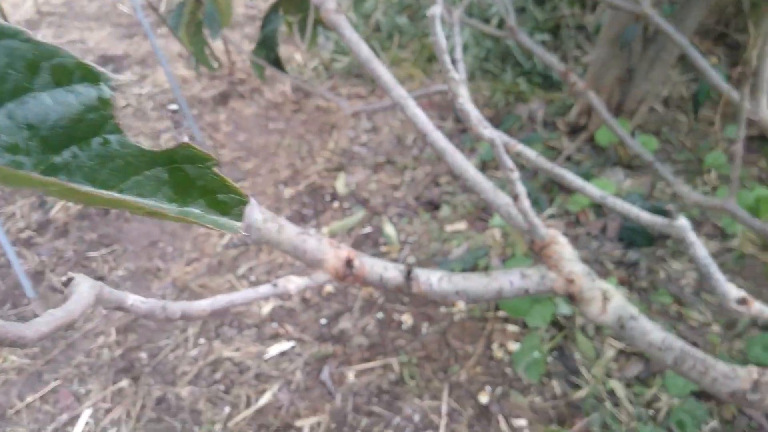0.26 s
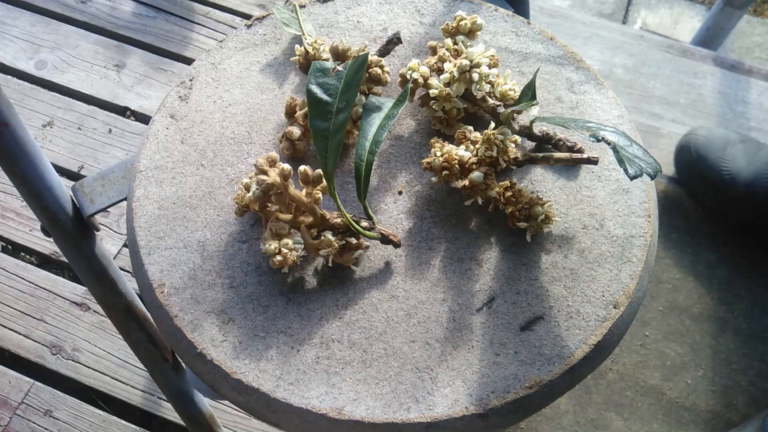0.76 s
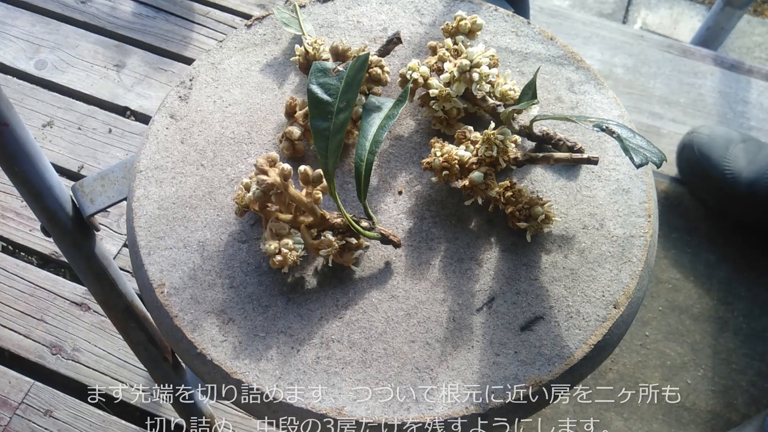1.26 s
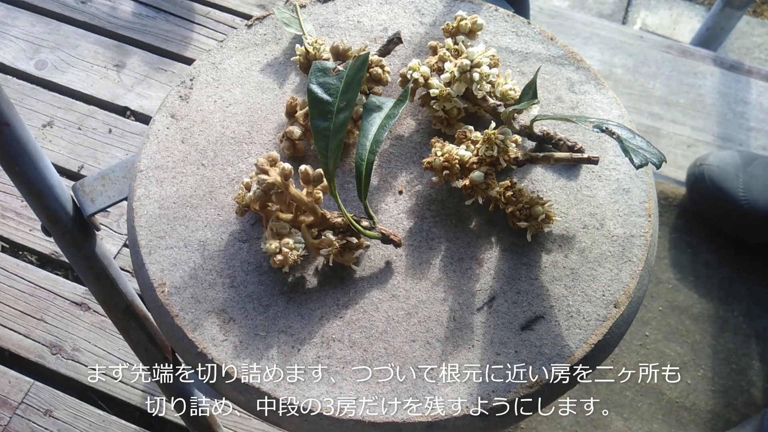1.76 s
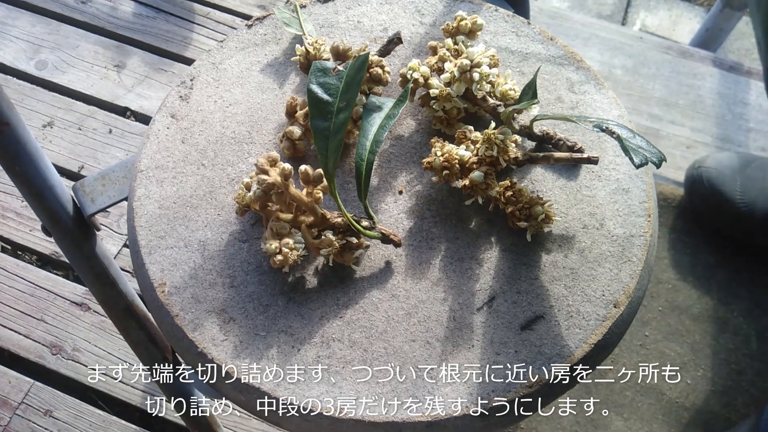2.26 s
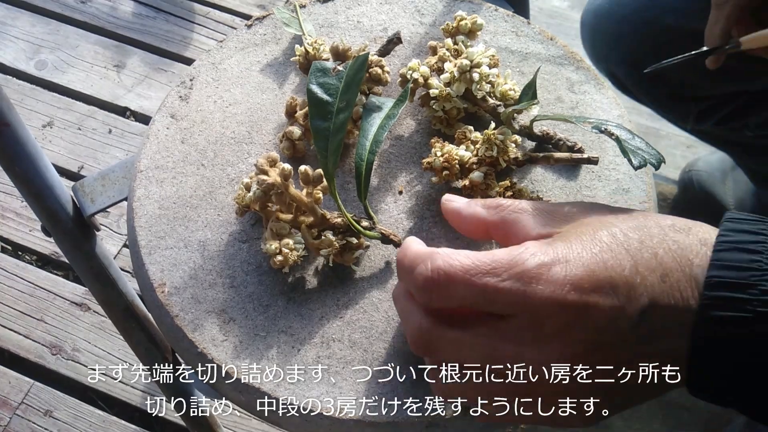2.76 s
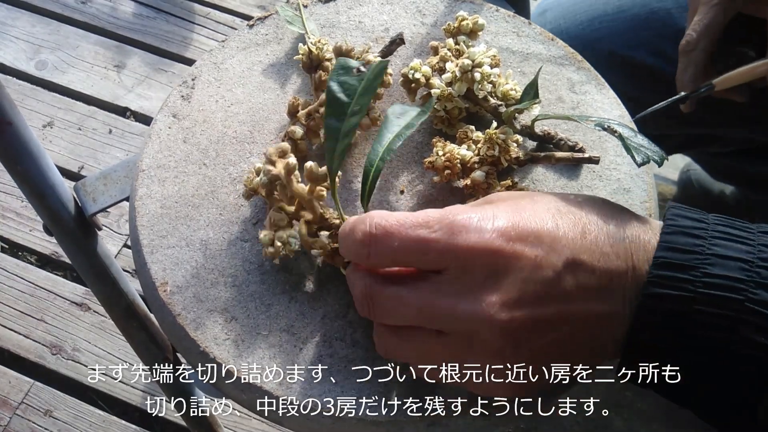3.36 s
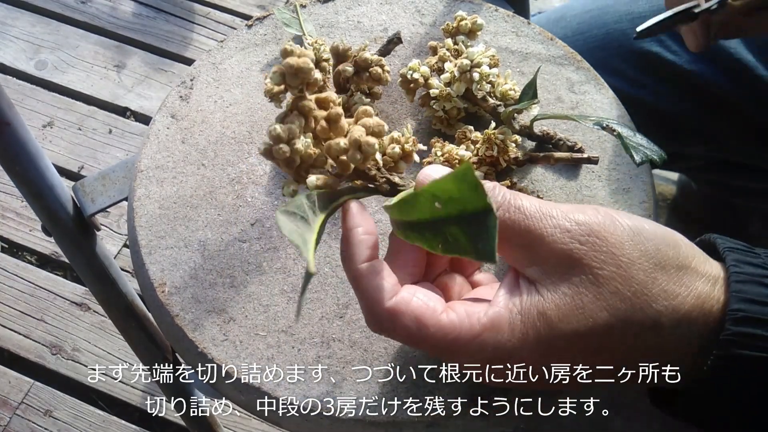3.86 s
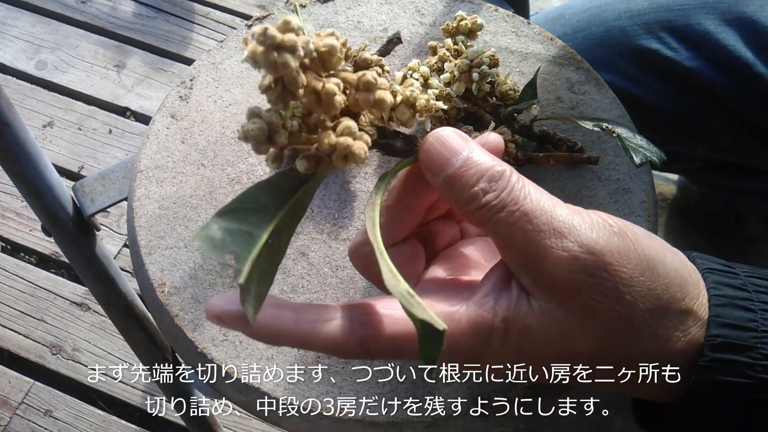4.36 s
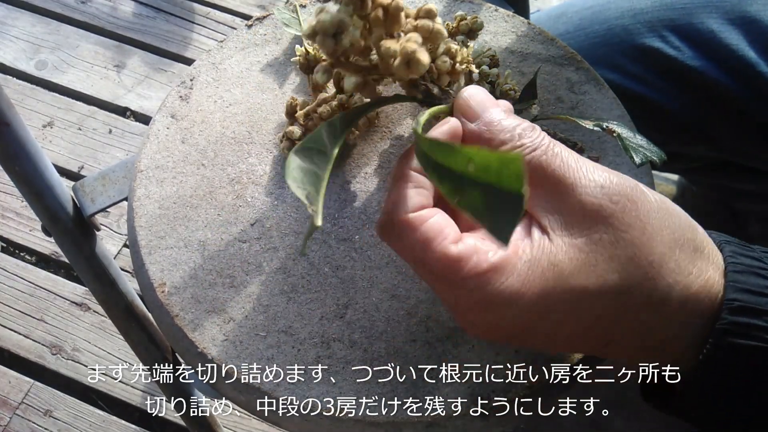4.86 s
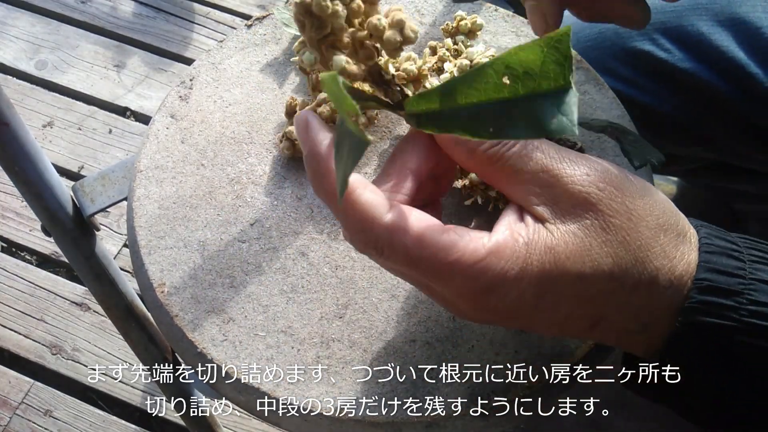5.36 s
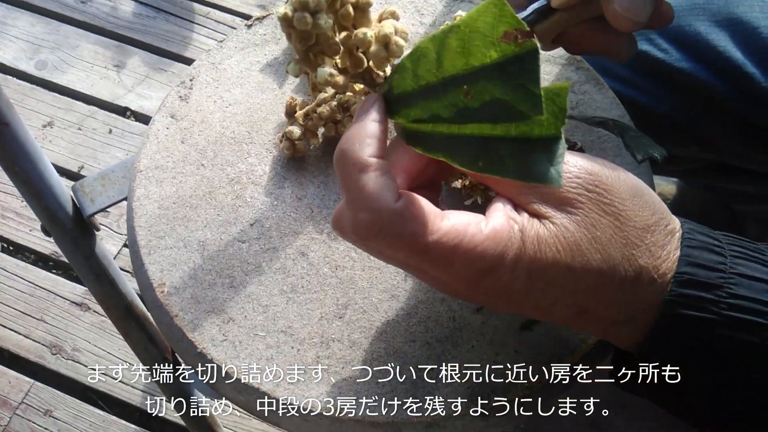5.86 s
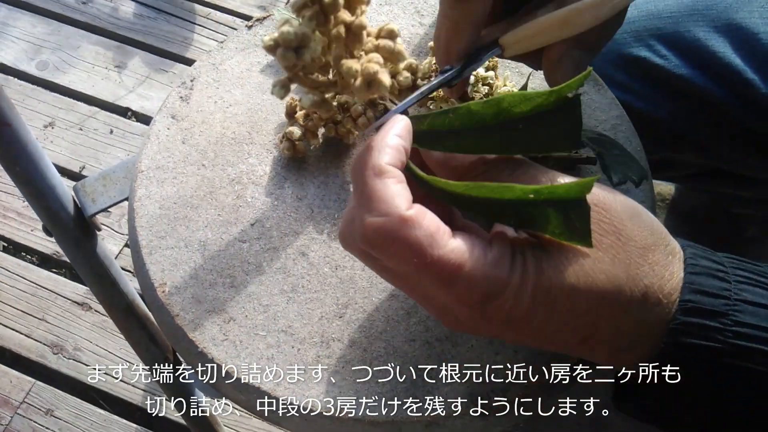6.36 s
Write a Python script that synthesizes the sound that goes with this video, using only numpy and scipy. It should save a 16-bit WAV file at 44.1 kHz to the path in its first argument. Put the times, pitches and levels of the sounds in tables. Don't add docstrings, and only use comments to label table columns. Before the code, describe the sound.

Outdoors on a wooden deck, garden shears knock and snap in irregular cuts while stiff leaves tick and rustle under light wind buffeting.

```python
import sys
import numpy as np
from scipy import signal
from scipy.fft import rfft, irfft, next_fast_len
from scipy.io import wavfile
from scipy.ndimage import map_coordinates

SR = 44100
rng = np.random.default_rng(int(sys.argv[2]) if len(sys.argv) > 2 else 0)


def magnitude_from_level(level_db):
    exponent = np.asarray(level_db, float) / 20
    return 10 ** exponent


def put_to_file(sound):
    columns = np.atleast_2d(sound).T
    safe = np.clip(columns, -1, 1)
    whole_steps = np.round(safe * 32767)
    wavfile.write(sys.argv[1], SR, whole_steps.astype(np.int16))


N = 291060
LAG = .43e-3


def unit(x):
    return x / np.sqrt(np.mean(x ** 2) + 1e-20)


def along(points, hz):
    f, v = np.transpose(points)
    return np.interp(np.log(hz + 1), np.log(f + 1), v)


def curves(rows):
    s, *cols = np.transpose(rows)
    return [np.interp(np.arange(N) / SR, s, c) for c in cols]


def wobble(rate):
    knots = rng.standard_normal(int(N * rate / SR) + 4)
    return map_coordinates(knots, [np.arange(N) * rate / SR])


def coloured(x, *spectra):
    m = 2 * next_fast_len(x.shape[-1] // 2 + 1024)
    hz = np.fft.rfftfreq(m, 1 / SR)
    db = sum(along(spectrum, hz) for spectrum in spectra)
    db = db - 40 * np.clip((hz - 15900) / 900, 0, 1)
    cepstrum = irfft(np.log(magnitude_from_level(np.maximum(db, -70))), m)
    cepstrum[1:m // 2] *= 2
    cepstrum[m // 2 + 1:] = 0
    return irfft(rfft(x, m) * np.exp(rfft(cepstrum)), m)[..., :x.shape[-1]]


def ports(pair, lag, pan_db):
    left = np.roll(pair[0], round(lag * SR))
    balance_db = np.array([pan_db, -pan_db]).reshape(2, -1) / 2
    return np.array([left, pair[1]]) * magnitude_from_level(balance_db)


def rush(spectrum, alike):
    m = next_fast_len(N)
    hz = np.fft.rfftfreq(m, 1 / SR)
    turn = np.arccos(np.clip(along(alike, hz), -1, 1)) / 2
    colour = magnitude_from_level(along(spectrum, hz)) * (hz < 15650)
    shape = colour * [np.cos(turn), np.sin(turn)]
    mid, side = irfft(rfft(rng.standard_normal((2, m))) * shape, m)[:, :N]
    return unit(np.array([mid + side, mid - side]))


def echoes(size, share):
    # (frequency [Hz], t60 [s])
    porch = [(500, .19), (2000, 0.18), (5000, 0.17), (8000, .18), (12000, 0.14)]
    noise = rng.standard_normal((3, size))
    pair = share * noise[0] + np.sqrt(1 - share ** 2) * noise[1:]
    hz, t, z = signal.stft(pair, SR, nperseg=128)
    decay = magnitude_from_level(-60 * t / along(porch, hz)[:, None])
    return signal.istft(z * decay, SR, nperseg=128)[1][:, :size]


def add(out, s, sound):
    start = round(s * SR)
    out[:, start:start + sound.shape[1]] += sound[:, :N - start]


def crack(spectrum, pan_db, tail_db, burst_s, splinter, size=SR // 4):
    # (frequency [Hz], level [dB])
    walls = [(3000, 1), (9000, -0.5), (15300, -6), (15800, -50)]
    t = np.arange(size) / SR
    shared = rng.standard_normal(size) + .5 * rng.standard_normal((2, size))
    burst = t / burst_s * np.exp(-t / burst_s)
    spike = (np.arange(size) == 12) + splinter * burst * shared
    direct = coloured(spike, spectrum)
    build = (1 - np.exp(-t / .0005)) * (1 + 1.18 * np.exp(-t / 0.0058))
    tail = coloured(echoes(size, 0.38) * build, spectrum, walls)
    tail = magnitude_from_level(tail_db) * tail / tail[:, :SR // 100].std()
    return ports(direct / np.abs(direct).max(), 0, pan_db) + ports(tail, 0, 0.29 * pan_db)


def clicks(table, colour, burst_s, splinter):
    out = np.zeros((2, N))
    for s, db, pan_db, tail_db, lag_ms in table:
        click = magnitude_from_level(db + 3.5) * crack(colour, pan_db, tail_db, burst_s, splinter)
        add(out, s - lag_ms / 2000, ports(click, lag_ms / 1000, 0))
    return out


def ring(modes, attack_s, scatter_db, size=SR // 4):
    hz, db, t60 = np.transpose(modes)[:, :, None]
    t = np.arange(size) / SR
    chance = rng.standard_normal((2, 2, len(modes), 1))
    decay = magnitude_from_level(db + scatter_db * chance[0] - 60 * t / t60)
    partials = decay * np.sin(2 * np.pi * hz * t + 0.28 * chance[1])
    return partials.sum(axis=1) * (1 - np.exp(-t / attack_s))


def bumps(table, modes):
    out = np.zeros((2, N))
    for s, db, pan_db in table:
        bump = magnitude_from_level(db - 5.0) * ring(modes, .0004, scatter_db=2)
        add(out, s, ports(bump, LAG, pan_db))
    return out


def air():
    # (time [s], level [dB])
    air_level = [(0.0, -74), (.68, -77), (.76, -71), (.99, -62), (1.07, -65), (1.39, -61.5), (1.56, -57.5),
                 (1.85, -62), (2.55, -60), (3.51, -61), (3.74, -60), (4.29, -63), (4.84, -62),
                 (5.98, -62.5), (6.21, -58.5), (6.6, -62)]
    # (frequency [Hz], density [dB per Hz])
    hum_colour = [(41, -35), (70, -8), (130, 0), (208, -5), (252, -2), (455, -7), (581, -11), (811, -11.5),
                  (958, -18), (1500, -18.5), (1950, -43), (3300, -120)]
    hiss_colour = [(410, -29), (700, 1), (955, -4), (1140, -7.5), (1710, -4.5), (2580, -7), (4570, -8),
                   (5600, -10.5), (6500, -9), (8200, -7), (8700, -14), (10000, -14.5), (14300, -14),
                   (15400, -16.5)]
    grove_colour = [(18, -31), (30, -3), (177, -13), (299, -3.5), (604, -14), (745, -10.5), (967, -14.5),
                    (1630, -14.5), (4400, -22.5), (7810, -23), (9380, -27.5), (15400, -26.5)]
    # (frequency [Hz], likeness [0-1])
    alike = [(60, 0.78), (300, 1), (700, 0.42), (2000, 0.2), (6000, 0.088), (15000, 0.09)]
    pass_s, pass_db, pass_width_s = 5.37, 5.5, 1.4
    change_s = .72
    hiss_db, = curves(air_level)
    t = np.arange(N) / SR
    hum_db = hiss_db - 1.5 + pass_db * np.exp(-((t - pass_s) / pass_width_s) ** 2)
    hum = ports(magnitude_from_level(hum_db + 3.5 + 1.6 * wobble(7)) * rush(hum_colour, alike), LAG, -2.3)
    hiss = ports(magnitude_from_level(hiss_db + 3.5 + 0.34 * wobble(5)) * rush(hiss_colour, alike), LAG, -0.28)
    grove = ports(magnitude_from_level(hiss_db + 7.5 + 1.3 * wobble(6.4)) * rush(grove_colour, alike), LAG, -.6)
    return np.where(np.arange(N) < change_s * SR, grove, hum + hiss)


def bird():
    # (start [s], end [s], pitch [Hz], level [dB])
    peeps = [
        (4.608, 4.628, 3700, -64),
        (6.472, 6.53, 3430, -66),
    ]
    out = np.zeros((2, N))
    for start, end, hz, db in peeps:
        t = np.arange(round((end - start) * SR)) / SR
        whistle = np.sin(2 * np.pi * hz * t) * signal.windows.tukey(len(t), .5)
        add(out, start, magnitude_from_level(db) * whistle * np.ones((2, 1)))
    return out


def turbulence():
    # (time [s], level [dB])
    wind_level = [(0.0, -84), (.68, -82), (.95, -68), (1.15, -52.5), (1.29, -57), (1.73, -65), (2.37, -67),
                  (2.58, -63), (2.9, -65.5), (3.2, -59), (3.45, -61), (3.93, -61), (4.39, -57), (4.5, -53),
                  (4.68, -56.5), (4.78, -64.5), (5.88, -66.5), (6.6, -59.5)]
    # (frequency [Hz], density [dB per Hz])
    buffet = [(7.1, -29), (12, -0.5), (32, -9), (60, -8), (92, -18.5), (130, -13), (170, -47), (290, -120)]
    level_db, = curves(wind_level)
    lean_db, veer_db = 7.5, 2.5
    pan_db = lean_db + veer_db * wobble(6)
    lumps = magnitude_from_level(1.4 * np.array([wobble(13), wobble(14)]))
    gusts = unit(lumps * rush(buffet, [(30, 0.17)]))
    return ports(magnitude_from_level(level_db + 6.0) * gusts, 0, pan_db)


def eddies():
    # (start [s], end [s], peak [dB], pitch [Hz])
    eddy_table = [(0.815, 0.848, -48.5, 91), (.9, 0.937, -49.5, 70), (1.009, 1.06, -40.5, 70),
                  (1.215, 1.234, -31, 115), (1.254, 1.317, -32.5, 62), (3.699, 3.82, -47.5, 55.2),
                  (4.43, 4.515, -27, 59.9), (4.488, 4.512, -30, 120), (4.521, 4.617, -39.5, 54.5),
                  (4.76, 4.82, -38, 60.3)]
    out = np.zeros((2, N))
    for start, end, db, hz in eddy_table:
        size = round((end - start) * SR)
        uneven = wobble(45.5)[:size]
        phase = 2 * np.pi * np.cumsum(hz * magnitude_from_level(1.83 * uneven)) / SR
        swirl = np.sin(phase) + 0.29 * np.sin(2 * phase + 1.1) + .05 * np.sin(3 * phase)
        swell = signal.windows.tukey(size, .6)
        add(out, start, magnitude_from_level(db) * swirl * swell * [[1], [.04]])
    return out


def pressure_push():
    # (start [s], height [full scale], rise [s], fall [s])
    push = [
        (1.02, 0.048, .06, .3),
        (1.04, 0.1, .12, 0.31),
    ]
    start, height, rise, fall = np.transpose(push)[:, :, None]
    t = np.maximum(np.arange(N) / SR - start, 0)
    return height * (1 - np.exp(-(t / rise) ** 1.4)) * np.exp(-t / fall)


def foot_thuds():
    # (time [s], peak [dB], left-right [dB])
    thuds = [
        (1.7638, -30, -2.5),
        (1.774, -35.5, -2.5),
        (1.783, -34, -1.5),
    ]
    # (frequency [Hz], level [dB], t60 [s])
    board = [(110, -8, .04), (167, 0.5, 0.045), (287, 1.5, 0.061), (420, -5, 0.03), (556, -4.5, 0.035),
             (807, -6, .03), (1160, -14, .02)]
    return bumps(thuds, board)


def stem_taps():
    # (time [s], peak [dB], left-right [dB])
    taps = [
        (4.033, -40, -3),
        (4.048, -40, -2),
        (4.056, -29.5, -3),
        (4.068, -38, 0),
        (4.085, -44, 0),
        (4.1, -49, 0),
    ]
    # (frequency [Hz], level [dB], t60 [s])
    table_top = [(468, -9, .08), (1260, -4, 0.036), (1390, 2, .05), (1650, -2, .045), (1950, -5, 0.044),
                 (2240, -5, 0.049)]
    return bumps(taps, table_top)


def leaf_rubs():
    # (time [s], bright [dB], hollow [dB], rise [s over 20 dB], fall [s over 20 dB])
    rubs = [(2.664, -54, -51.5, .01, 0.11), (2.862, -54, -72, .006, .08), (3.745, -54, -67, .02, 0.11),
            (4.038, -40, -50, 0.02, 0.069), (4.01, -57, -68, .02, .1), (4.06, -49, -45, .02, .09),
            (4.205, -61, -72, .02, .2), (4.28, -48.5, -59, 0.058, 0.054), (4.648, -46, -58, .015, 0.025),
            (4.63, -56, -73, .05, .05), (5.12, -56, -54, .015, .08), (5.332, -48, -60, .006, .015),
            (5.35, -62, -63, .02, .15), (5.41, -61.5, -59, .04, 0.088), (5.518, -61, -58.5, 0.014, .15),
            (6.114, -51, -58, 0.0054, 0.036), (6.213, -42.5, -53, 0.028, 0.018),
            (6.255, -50.5, -58.5, 0.16, .07)]
    # (frequency [Hz], density [dB per Hz])
    scrape_colour = [(1290, -32), (2200, -1.5), (2660, -13), (2870, 0), (5860, -5), (6800, -3.5),
                     (10900, -11.5), (14200, -10), (16000, -40)]
    hollow_colour = [(250, -25), (400, -4), (600, -4.5), (900, -3), (1500, -5), (2200, -7.5), (2900, -21),
                     (3600, -48)]
    strokes = np.zeros((2, N))
    t = np.arange(-SR // 4, SR // 2) / SR
    for s, bright_db, hollow_db, rise, fall in rubs:
        drop_db = 20 * np.maximum(-t / rise, t / fall)
        add(strokes, s + t[0], magnitude_from_level(np.array([[bright_db], [hollow_db]]) - drop_db))
    grains = magnitude_from_level(4.2 * wobble(400) + 2.4 * wobble(60))
    bright = magnitude_from_level(-4.0) * unit(grains * rush(scrape_colour, [(1000, 0.18)]))
    hollow = unit(magnitude_from_level(3.8 * wobble(90)) * rush(hollow_colour, [(1000, 0.24)]))
    return strokes[0] * bright + strokes[1] * hollow


def leaf_ticks():
    # (time [s], peak [dB], left-right [dB], tail [dB], left lag [ms])
    ticks = [(.558, -50.5, 6, -23, .05), (1.1275, -48, 7, -19, .05), (3.011, -31.5, 2, -13.5, .1),
             (4.031, -27, -8, -29, .3), (4.039, -23, -9, -26, .3), (4.047, -29, -3, -22, .3),
             (4.055, -24.5, 4, -22, .3), (4.261, -46, 9, -17, .05), (4.6475, -36.5, 8, -21, .05),
             (5.3315, -21, 0, -33, .05), (5.12, -44, 0, -20, .2), (2.987, -48, 0, -20, .2),
             (2.862, -48, 0, -20, .2), (5.354, -46, 3, -18, .05)]
    # (frequency [Hz], level [dB])
    tick_colour = [(1500, -44), (2600, -24), (3600, -13), (4900, -17), (6400, -1.5), (7600, -1), (8800, -2),
                   (10700, -13), (13000, -5), (14500, -9), (16000, -16)]
    return clicks(ticks, tick_colour, burst_s=.0004, splinter=1.2)


def pivot_squeak():
    # (start [s], end [s], slip rate [Hz], level [dB])
    squeak_setting = (6.203, 6.216, 2109, -47.5)
    # (multiple of slip rate, level [dB])
    overtones = [(1, -11), (2, -4), (3, 3), (4, 0), (5, -9), (6, -5), (7, -2)]
    start, end, hz, db = squeak_setting
    t = np.arange(round((end - start) * SR)) / SR
    phase = 2 * np.pi * hz * (t + .4 * t ** 2)
    stack = sum(magnitude_from_level(level) * np.sin(k * phase + rng.uniform(0, 2 * np.pi)) for k, level in overtones)
    swell = (.4 + .6 * t / t[-1]) * signal.windows.tukey(len(t), .3)
    out = np.zeros((2, N))
    add(out, start, magnitude_from_level(db + np.array([[2.5], [-2.5]])) * stack * swell)
    return out


def blade_nibbles():
    # (time [s], peak [dB], left-right [dB], tail [dB], left lag [ms])
    nibbles = [
        (2.6155, -42, -2, -8, .4),
        (6.113, -37, 6, -18, .05),
        (6.1165, -35, 6, -22, .05),
        (6.1225, -39, 7, -20, .05),
    ]
    # (frequency [Hz], level [dB])
    nibble_colour = [(590, -41), (1000, -17), (2390, -2.5), (4360, -9), (8160, -6), (9060, -15),
                     (14900, -21), (16000, -30)]
    return clicks(nibbles, nibble_colour, burst_s=.0006, splinter=.4)


def blade_snaps():
    # (time [s], peak [dB], left-right [dB], tail [dB], left lag [ms])
    snaps = [
        (2.691, -38, -1, -16, .42),
        (3.0077, -23.5, 4, -15.5, .3),
        (3.5682, -11, -5.5, -23, .3),
    ]
    # (frequency [Hz], level [dB])
    snap_colour = [(400, -35), (800, -9), (1250, -11), (1890, -1), (2300, -4.5), (3300, 1.5), (4500, -1),
                   (6000, -1), (7500, 2.5), (8600, -1.5), (10500, -11), (14900, -13), (16000, -32)]
    return clicks(snaps, snap_colour, burst_s=.0005, splinter=.15)


def handle_knocks():
    # (time [s], ring [dB], left-right [dB], middle modes [dB], upper modes [dB])
    knocks = [
        (1.4513, -19, -4, 1.5, 3.5),
        (2.6199, -20.5, -4.5, -1.5, -2),
        (5.0012, -24, -4, 3, -6),
    ]
    # (frequency [Hz], level [dB], t60 [s])
    handle = [(845, -17, .07), (915, -9, .09), (960, 3, 0.045), (1080, -10, .06), (1300, -11.5, 0.058),
              (1792, -0.5, 0.039), (1830, -10, .12), (1906, -9.5, .04), (2440, -17, .04),
              (2740, -15, 0.041), (3148, -8.5, 0.056), (3680, -19, .04), (4640, -9, .035),
              (4870, -15.5, 0.036)]
    # (frequency [Hz], level [dB])
    knock_colour = [(300, -56), (700, -25), (950, -7), (1400, -7.5), (1850, -0.5), (2500, -9), (3100, -2),
                    (4000, -11), (5700, -8), (8000, -4.5), (9500, -18), (15000, -16), (16500, -35)]
    low_lag = .3e-3
    crack_db = 3.5
    out = np.zeros((2, N))
    for s, db, pan_db, middle_db, upper_db in knocks:
        modes = []
        for hz, level, t60 in handle:
            lift_db = upper_db if hz > 2100 else middle_db if hz > 1500 else 0
            modes.append((hz, level + lift_db, t60))
        low = ports(ring(modes[:3], .002, scatter_db=1), low_lag - LAG, 0)
        hollow = magnitude_from_level(db) * (low + ring(modes[3:], 0.00087, scatter_db=1.5))
        tail = echoes(SR // 5, 0.45)
        tail = tail / np.linalg.norm(tail[0])
        rough = signal.fftconvolve(hollow, tail, axes=1)[:, :hollow.shape[1]]
        hollow = hollow + magnitude_from_level(-8) * rough
        strike = magnitude_from_level(db + crack_db) * crack(knock_colour, pan_db, -14.5, 0.00067, 0.36)
        add(out, s - LAG / 2, ports(hollow, LAG, pan_db))
        add(out, s - LAG / 2, ports(strike, LAG, 0))
    return out


def scene():
    outdoors = air() + bird()
    wind = turbulence() + eddies() + pressure_push()
    wood = foot_thuds() + stem_taps()
    leaves = leaf_rubs() + leaf_ticks()
    shears = pivot_squeak() + blade_nibbles() + blade_snaps() + handle_knocks()
    return outdoors + wind + wood + leaves + shears


def low_pass(x):
    return signal.sosfilt(signal.butter(12, 16820, fs=SR, output="sos"), x)


def record(dry):
    # (time [s], gain)
    fade = [(0, 0.98), (.67, 0.97), (.7, 0), (.752, 0), (.762, 1), (6.6, 0.96)]
    mix = dry * curves(fade)[0]
    return low_pass(mix)


dry = scene()
out = record(dry)
put_to_file(out)
```